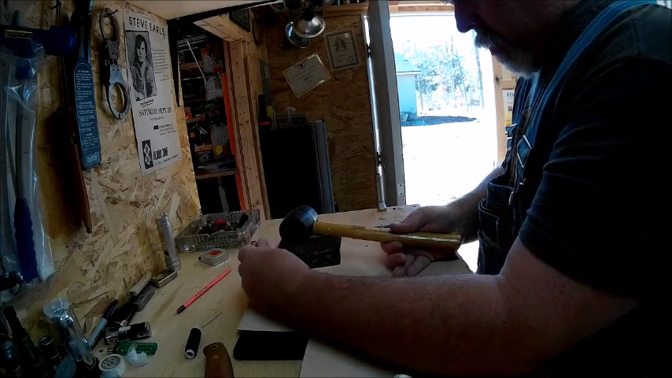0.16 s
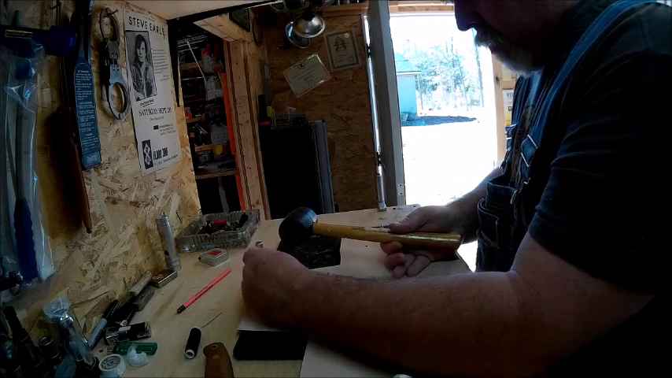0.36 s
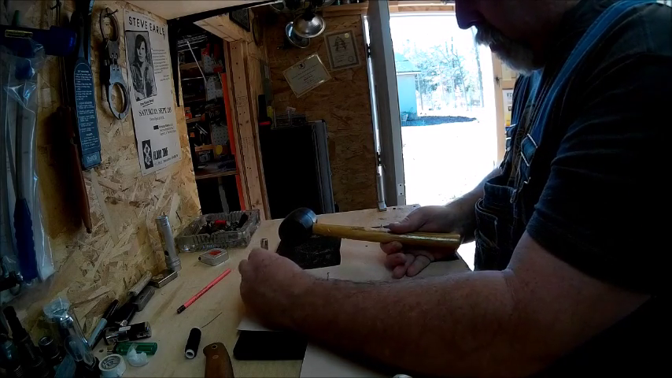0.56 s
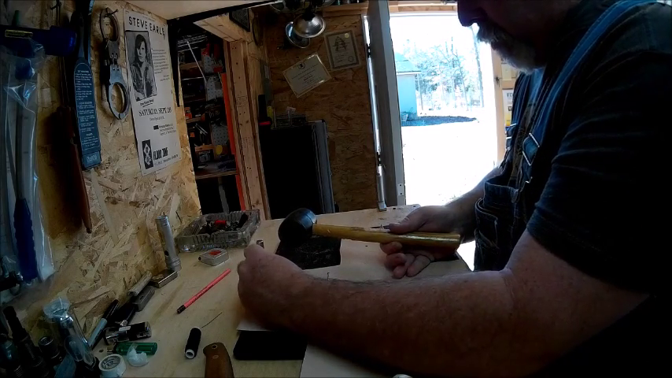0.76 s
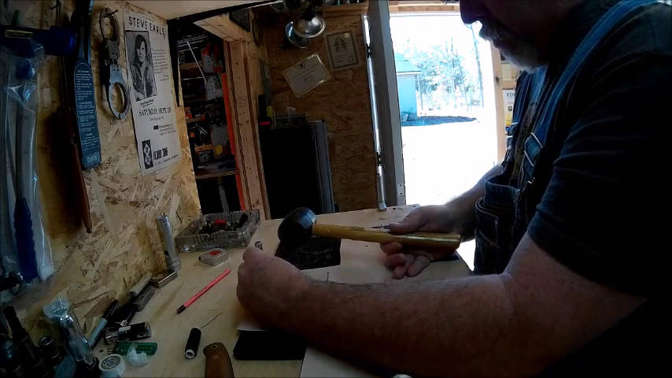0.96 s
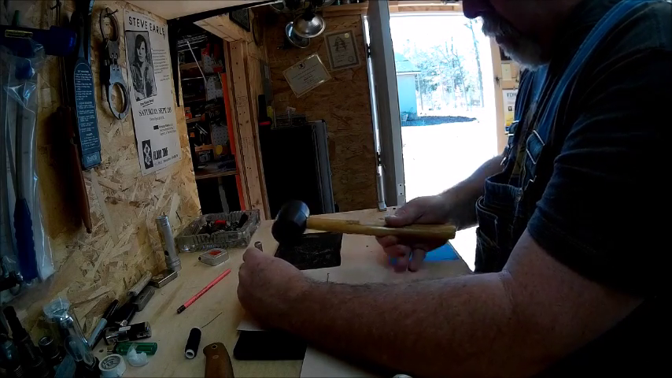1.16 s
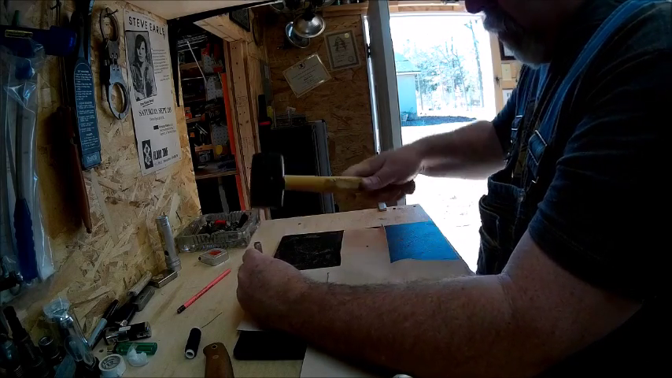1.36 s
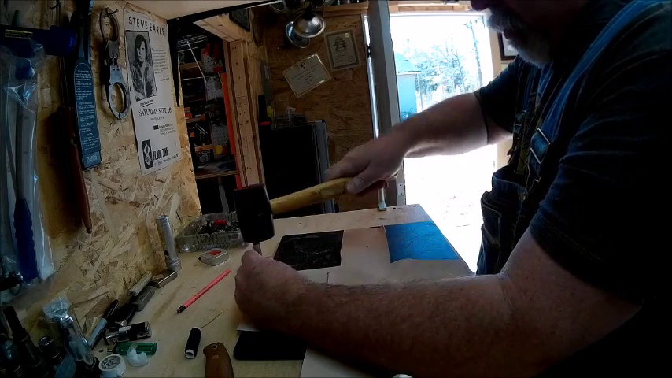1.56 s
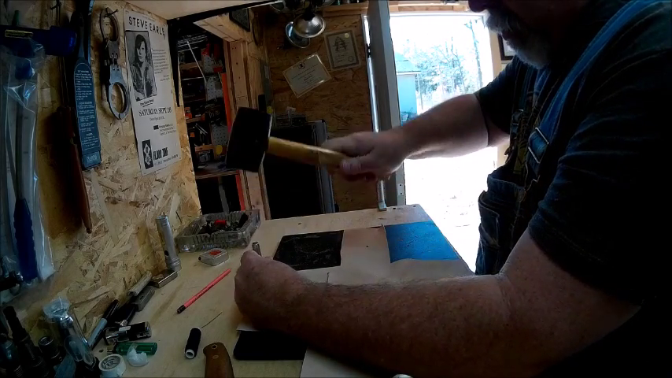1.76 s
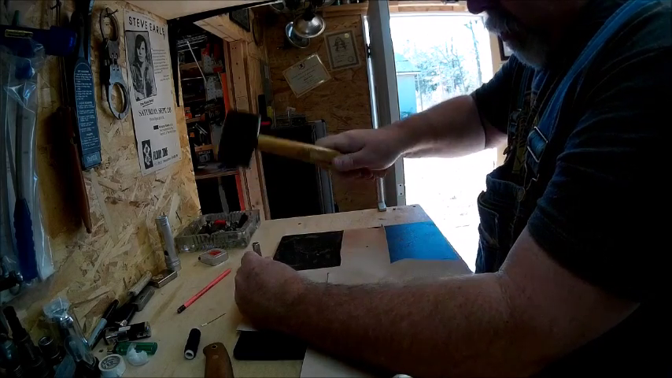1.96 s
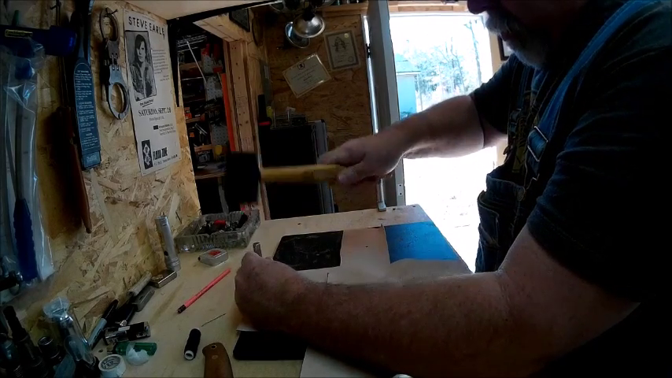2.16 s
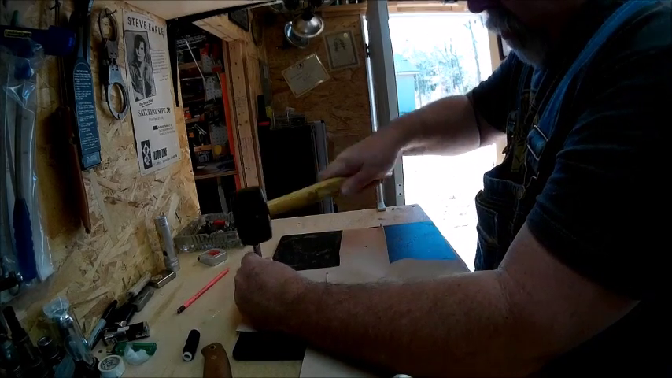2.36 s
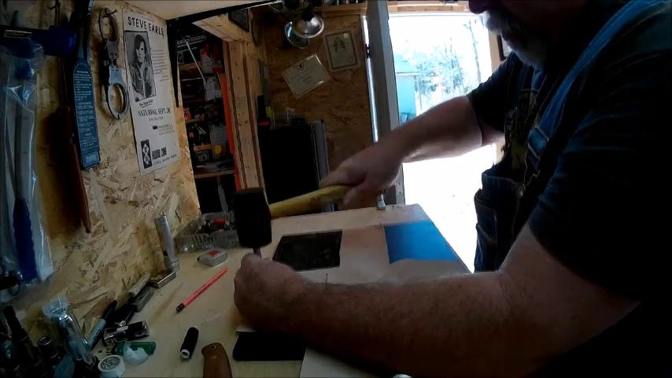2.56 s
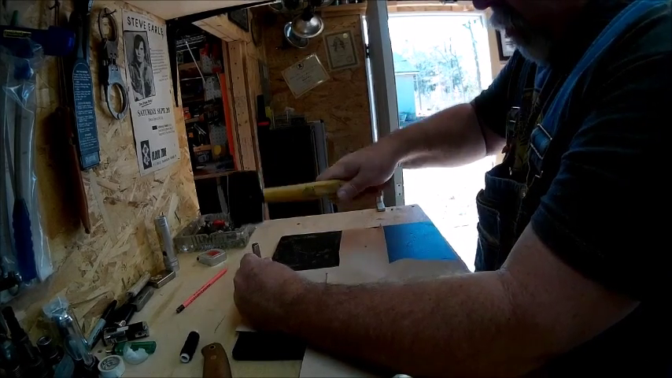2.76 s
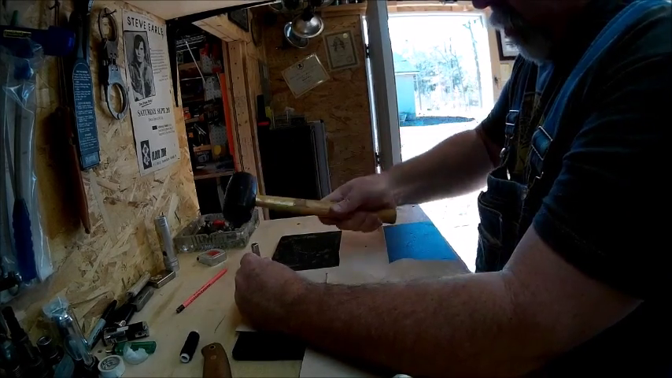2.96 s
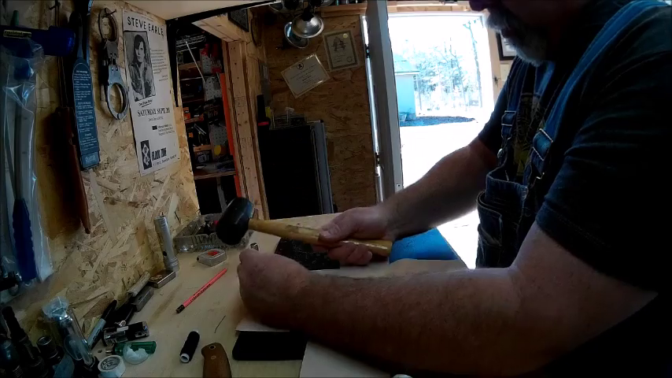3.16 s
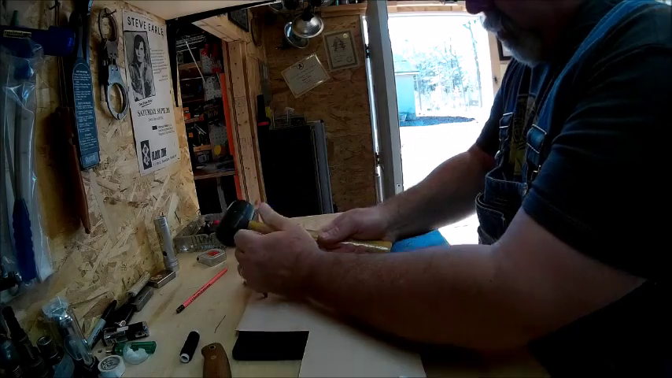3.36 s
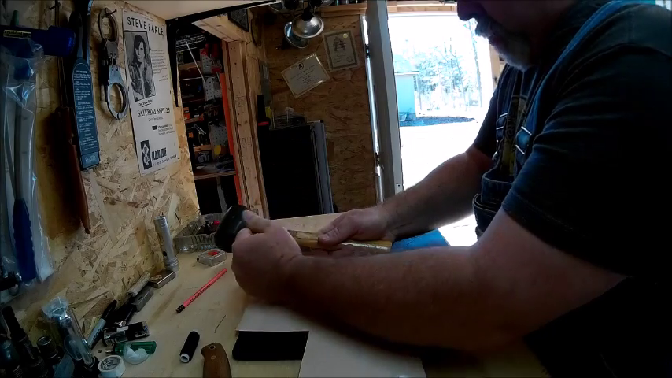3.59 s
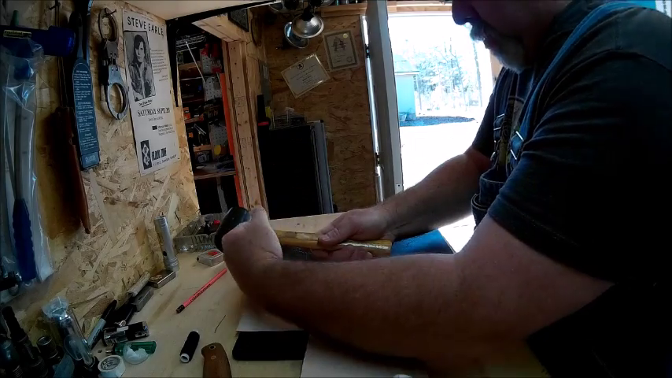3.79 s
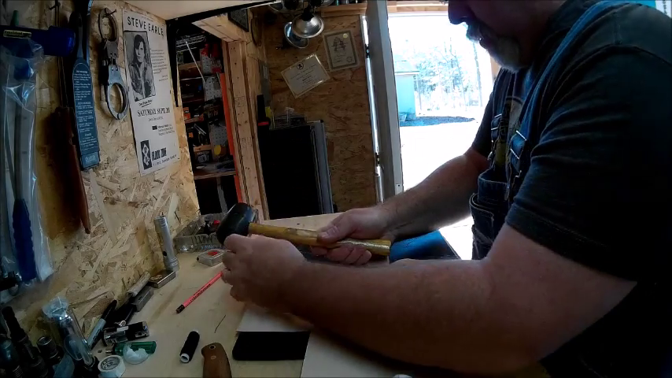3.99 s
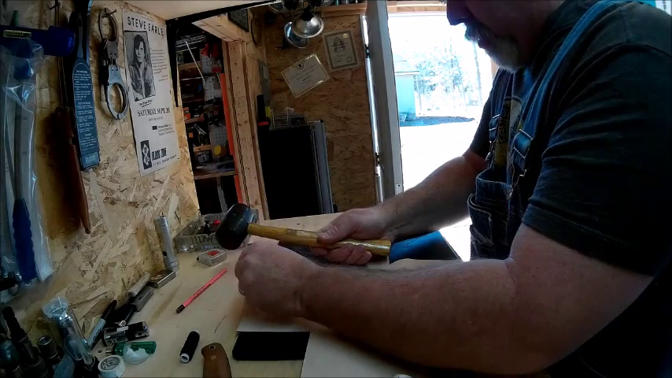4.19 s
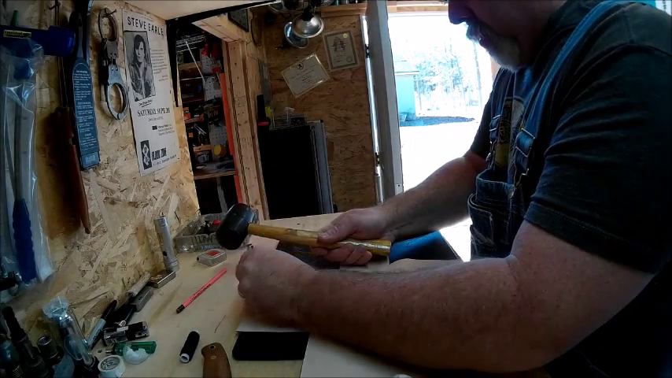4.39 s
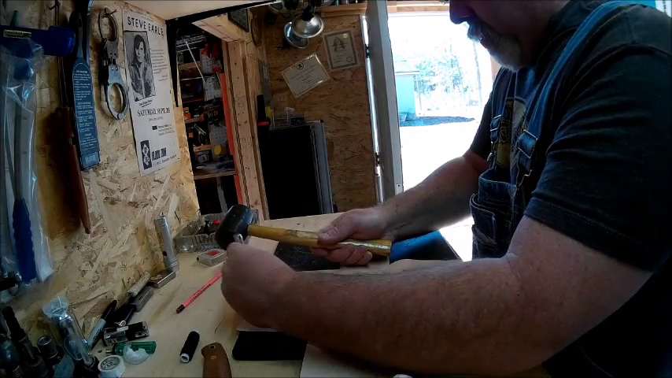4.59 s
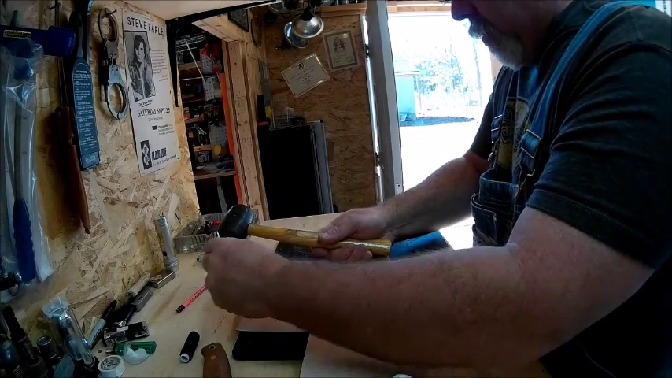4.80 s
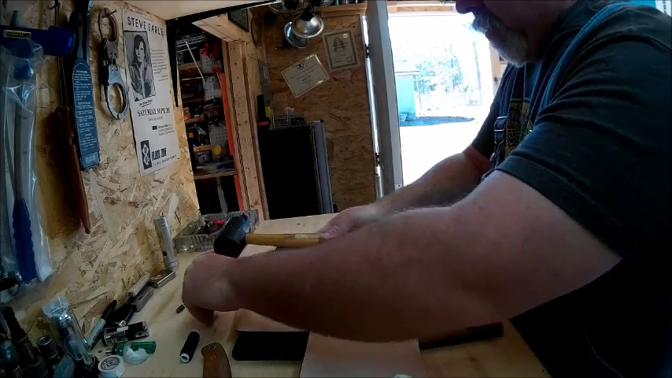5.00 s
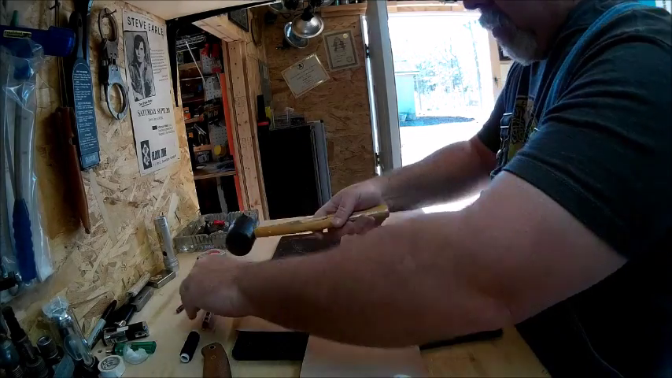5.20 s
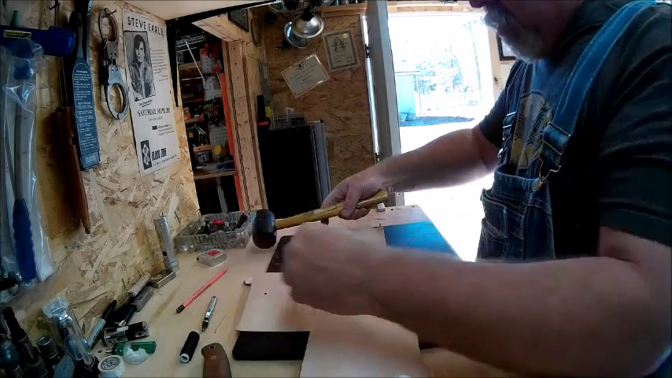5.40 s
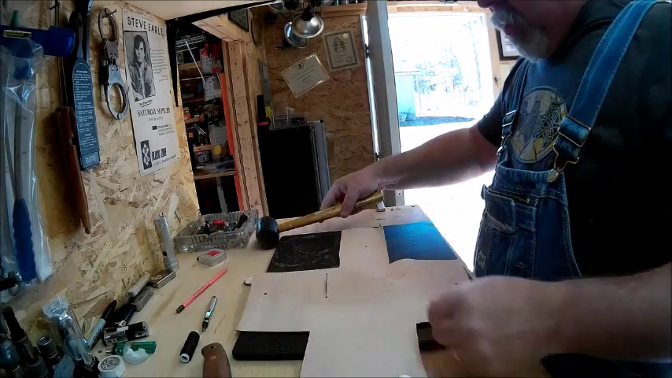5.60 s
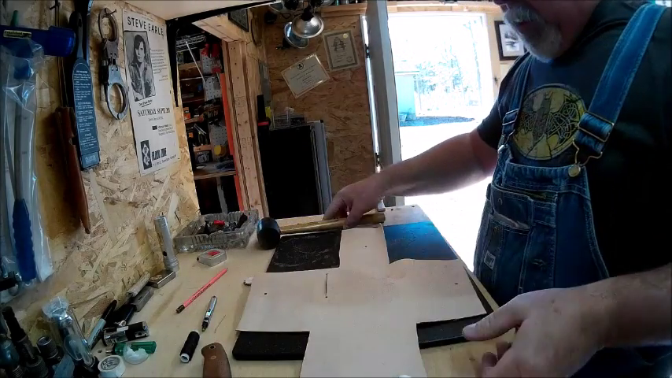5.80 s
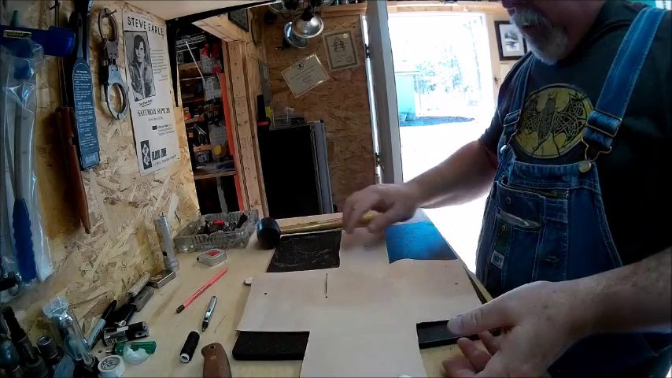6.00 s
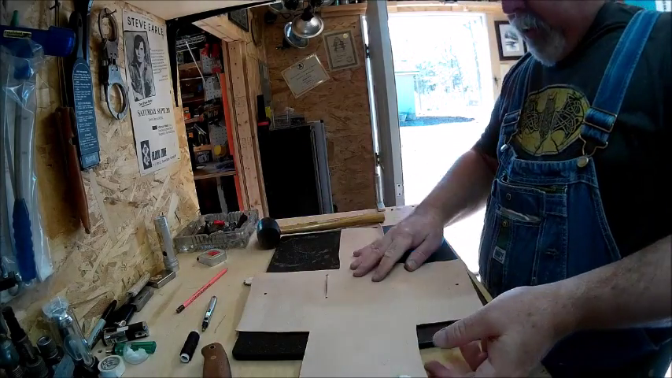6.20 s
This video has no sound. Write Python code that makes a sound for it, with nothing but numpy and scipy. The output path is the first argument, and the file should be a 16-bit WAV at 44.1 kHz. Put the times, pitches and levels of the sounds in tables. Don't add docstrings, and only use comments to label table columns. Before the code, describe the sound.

Close to a wooden bench in a small workshop, a mallet touches a steel punch lightly, then strikes four quick, even blows through leather, the last two hardest. Each is a clipped thud and crack, with loose tools hopping and rattling after. Small snaps and faint bumps follow, then the punch clacks down, the mallet lands with duller knocks and a brief drag. Faint outdoor murmur and hiss lie beneath.

```python
import sys
import numpy as np
from scipy import signal
from scipy.fft import rfft, irfft
from scipy.io import wavfile
from scipy.ndimage import uniform_filter1d

SR = 44100
rng = np.random.default_rng(int(sys.argv[2]) if len(sys.argv) > 2 else 0)


def dump_mix(stems):
    frames = np.atleast_2d(stems).T
    limited = np.clip(frames, -1, 1)
    pcm = np.round(limited * 32767).astype(np.int16)
    wavfile.write(sys.argv[1], SR, pcm)


def magnitude_from_level(level_db):
    exponent = np.asarray(level_db, float) / 20
    return 10 ** exponent


N = 275580

# t/s, thud level/dB, clack level/dB, brightness re clack/dB
BLOWS = [
    (1.8483, -1.5, -12, -10),
    (2.0846, -1, -9, -7),
    (2.3213, 1, -7.5, -1),
    (2.5692, 2, -5.5, -8),
]
# t/s, contact time/s, clack level/dB, brightness re clack/dB, clack t60/s
AIM = [
    (1.5113, .0022, -44, -20, .17),
]
# f/Hz, level/dB, t60/s
BENCH_MODES = [(62, -20, .22), (80, -11, .11), (99, -2, .1), (128, -9, .12), (158, 0, .09), (165, 9, .03),
               (246, -29, .5), (255, -14, .09), (338, -23, .35), (362, -6, .14), (455, -12, .08),
               (510, -20, .16), (575, -13, .11)]
# f/Hz, level/dB
BLOW_COLOUR = [(180, -37.5), (300, -13), (437, -4.5), (577, -6.5), (814, -5), (1020, -4), (1670, -5),
               (1820, -24.5), (2480, -20.5), (3440, -27), (4620, -27), (10600, -38.5), (15000, -49.5)]
# f/Hz, level/dB
TOOL_COLOUR = [(240, -39.5), (400, -2), (842, -2), (1150, -2.5), (1440, 4), (1960, -6), (2570, -14),
               (3360, -22.5), (4590, -18), (7840, -37), (14000, -48)]


def read(points, hz):
    f, value = np.transpose(points)
    return np.interp(np.log(hz + 1), np.log(f + 1), value)


def add(mix, s, sound):
    part = mix[round(s * SR):][:len(sound)]
    part += sound[:len(part)]


def peaked(x, db):
    power = uniform_filter1d(x ** 2, size=200)
    return magnitude_from_level(db) * x / np.sqrt(power.max())


def thud(modes, weights_db, contact_s, rise_s):
    t = np.arange(SR // 2) / SR
    hz, mode_db, t60 = np.transpose(modes)[:, :, None]
    decay = magnitude_from_level(mode_db + weights_db - 60 * t / t60)
    ring = -(decay * np.cos(2 * np.pi * hz * t)).sum(0)
    push = np.sin(np.pi * np.arange(0, 1, 1 / (contact_s * SR)))
    return signal.fftconvolve(ring * (1 - np.exp(-t / rise_s)), push / push.sum())


def soft_thud(db, pitch_hz, focus_db=5):
    # f/Hz, level/dB, t60/s
    far_end = [(71.4, -26, 0.12), (102.2, -2.5, 0.16), (127.8, 2.5, 0.2), (182.3, -2.5, 0.21),
               (243, 4, 0.031), (354.7, -9.5, 0.24), (382.3, 1.5, 0.081), (509, -2.5, 0.079),
               (575, -8, 0.047)]
    off_pitch_octaves = np.log2(np.transpose(far_end)[0][:, None] / pitch_hz)
    weights_db = -focus_db * off_pitch_octaves ** 2
    return peaked(thud(far_end, weights_db, contact_s=0.00079, rise_s=0.0036), db)


def clack(db, colour, bright_db, t60, noise, rise_s=.0004, high_damping=0.28):
    t, hz = np.arange(len(noise)) / SR, np.fft.rfftfreq(len(noise), 1 / SR)
    above_knee = np.clip(np.log2((hz + 1) / 1700) / .6, 0, 1)
    softness_db = (bright_db + 16.0) * above_knee
    centres = 250 * 2 ** (np.arange(13)[:, None] / 2)
    shares = np.clip(1 - abs(2 * np.log2((hz + 1) / centres)), 0, 1)
    coloured = rfft(noise) * magnitude_from_level(read(colour, hz) + softness_db)
    bands = irfft(coloured * shares, len(noise))
    fall_db_per_s = 60 / np.clip(t60, .008, .6) * (centres / 1300) ** high_damping
    decaying = (bands * magnitude_from_level(-fall_db_per_s * t)).sum(0)
    return peaked(decaying * (1 - np.exp(-t / rise_s)), db)


def hush(patchy_db=1.):
    # f/Hz, level/dB
    hush_colour = [(12, -40.5), (20, 8), (91, -2), (150, -1.5), (193, -7), (241, -5), (780, -15.5),
                   (873, -16.5), (1290, -17), (2140, -21.5), (13900, -24.5), (16000, -33.5)]
    level_db = -63
    frame_count, hz = N // 256 + 5, np.fft.rfftfreq(1024, 1 / SR)
    real, imag, patches = rng.standard_normal((frame_count, 513, 3)).T
    patches = uniform_filter1d(uniform_filter1d(patches, 8, 0), 16, 1)
    drift_db = patchy_db * patches / patches.std() * (hz < 2000)[:, None]
    spectra = (real + 1j * imag) * magnitude_from_level(read(hush_colour, hz)[:, None] + drift_db)
    noise = signal.istft(spectra, nperseg=1024, noverlap=768)[1][:N]
    return magnitude_from_level(level_db) * noise / noise.std()


def shed(x):
    # f/Hz, t60/s
    room_decay = [(60, 0.43), (250, 0.29), (1000, 0.25), (3000, 0.14), (8000, 0.17), (15000, 0.15)]
    reflections = np.zeros(SR)
    at = np.arange(150, SR - 20, 20)
    reflections[at + rng.integers(0, 20, len(at))] = rng.choice([-1., 1.], len(at))
    hz, t, z = signal.stft(reflections, SR, nperseg=256)
    thin_walls = (hz ** 2 / (hz ** 2 + 500 ** 2))[:, None]
    decay = magnitude_from_level(-60 * t / read(room_decay, hz)[:, None])
    tail = signal.istft(z * decay * thin_walls, SR, nperseg=256)[1]
    return signal.fftconvolve(x, tail / np.linalg.norm(tail))[:N]


def rumble(db=-30, t60=0.55, top_hz=170):
    out, t = np.zeros(N), np.arange(24000) / SR
    low = signal.butter(N=2, Wn=[58, top_hz], btype="band", fs=SR, output="sos")
    strikes = BLOWS + [(AIM[0][0], -18)]
    envelope = magnitude_from_level(-60 * t / t60) * (1 - np.exp(-t / .01))
    for row, noise in zip(strikes, rng.standard_normal((len(strikes), len(t)))):
        add(out, row[0], peaked(signal.sosfilt(low, noise) * envelope, db + row[1]))
    return out


def drag(slips_per_s=2500, spread_db=2):
    # f/Hz, width/Hz, level/dB
    drag_body = [(2130, 85, 7), (1500, 950, 3), (4330, 820, -12), (9000, 2100, -19)]
    start_s, length_s, level_db, sag_db = 5.685, 0.113, -56.5, -6
    t = np.arange(0, length_s, 1 / SR)
    chance, size, side = rng.random((8192, 3))[:len(t)].T
    sizes = magnitude_from_level(-spread_db * np.log(size + 1e-9))
    slips = sizes * (chance < slips_per_s / SR) * np.sign(side - .5)
    body = sum(magnitude_from_level(g) * signal.lfilter(*signal.iirpeak(f, f / w, SR), slips) for f, w, g in drag_body)
    out = np.zeros(N)
    stroke = magnitude_from_level(level_db + sag_db * t / length_s) * signal.windows.tukey(len(t), .25)
    add(out, start_s, body / body.std() * stroke)
    return out


def steel():
    # t/s, f/Hz, level/dB, t60/s
    steel_lines = [
        (5.21, 6040, -49, .22),
        (2.69, 11230, -68, .35),
        (2.75, 11230, -68, .35),
        (6.228, 1185, -57, .06),
        (3.539, 1150, -50, .035),
    ]
    out, t = np.zeros(N), np.arange(SR // 3) / SR
    for s, hz, db, t60 in steel_lines:
        add(out, s, magnitude_from_level(db - 60 * t / t60) * np.sin(2 * np.pi * hz * t))
    return out


def snaps():
    # t/s, level/dB, t60/s
    releases = [
        (3.5354, -46, 0.025),
        (3.5405, -55.5, 0.04),
        (4.3914, -60.5, 0.028),
        (5.497, -58, 0.0076),
    ]
    # f/Hz, level/dB
    snap_colour = [(530, -37), (900, -7), (1850, -1), (3430, -11), (4800, -3), (5680, -13), (6560, -4),
                   (16000, -23)]
    out = np.zeros(N)
    for (s, db, t60), noise in zip(releases, rng.standard_normal((len(releases), 2048))):
        add(out, s, clack(db, snap_colour, -12.5, t60, noise))
    return out


def taps(crack_db=1, note_db=9):
    # t/s, clack level/dB, thud re clack/dB, thud f/Hz, note f/Hz
    handle_taps = [
        (3.963, -35.5, -5, 220, 622),
        (5.072, -35.5, -12, 402, 1353),
        (5.83, -32.5, -16, 366.5, 1140),
    ]
    # f/Hz, level/dB
    handle_colour = [(150, -10), (250, -5), (383, 3.5), (715, 0.5), (1050, 1.5), (1340, 3.5), (1770, -4.5),
                     (2330, -30.5), (6000, -40.5), (7800, -76.5), (13200, -120)]
    out, t = np.zeros(N), np.arange(4096) / SR
    for row, noise in zip(handle_taps, rng.standard_normal((len(handle_taps), 8192))):
        s, db, thud_db, thud_hz, note_hz = row
        add(out, s, clack(db + crack_db, handle_colour, -11, 0.0062, noise[-1024:], rise_s=0.0018))
        add(out, s, clack(db, handle_colour, -10.5, 0.15, noise))
        envelope = magnitude_from_level(db + note_db - 60 * t / .04) * (1 - np.exp(-t / .0005))
        add(out, s, envelope * np.sin(2 * np.pi * note_hz * t))
        add(out, s, soft_thud(db + thud_db + 5, thud_hz, focus_db=1.5))
    return out


def knocks():
    # t/s, clack level/dB, thud re clack/dB, thud f/Hz
    landings = [(3.179, -72, 14, 78), (3.628, -76.5, 21, 96.3), (3.769, -72, 22.5, 94.2),
                (5.2092, -20, -5.5, 423), (5.2419, -28.5, -3.5, 435), (5.263, -36.5, -0.5, 388),
                (5.498, -49, 20, 197), (5.508, -52.5, 26, 154), (5.548, -34, 17.5, 390),
                (5.565, -31, 7.5, 378), (5.596, -47, 13, 150), (5.618, -57.5, 30, 130),
                (5.644, -54, 22.5, 395), (5.685, -59.5, 21.5, 257), (5.735, -58, 17, 110),
                (5.778, -60.5, 26.5, 109), (6.232, -63.5, -4, 148)]
    # f/Hz, level/dB
    knock_colour = [(150, -21), (250, -15), (369, -1), (606, -5), (921, 3), (1150, -0.5), (1530, 5),
                    (2710, -6.5), (4790, -11.5), (5650, -23.5), (9000, -45), (11700, -78), (19800, -120)]
    # brightness re clack/dB, crack re clack/dB, clack t60/s, t60 left by the holding hand/s
    punch_down = (-12, 6, 0.19, 0.5)
    mallet_down = (-21, -3, .075, .11)
    mallet_down_s, bounce_gap_s, bounce_db = 5.4, .037, -7
    out, before = np.zeros(N), 0
    for row, noise in zip(landings, rng.standard_normal((len(landings), 8192))):
        s, db, thud_db, pitch_hz = row
        bright_db, crack_db, t60, held_t60 = punch_down if s < mallet_down_s else mallet_down
        if 0 < s - before < bounce_gap_s:
            bright_db += bounce_db
            crack_db += bounce_db / 2
        before = s
        add(out, s, clack(db + crack_db, knock_colour, bright_db + 3, 0.012, noise[-2048:], rise_s=0.0006))
        add(out, s, clack(db, knock_colour, bright_db, t60, noise))
        push = soft_thud(db + thud_db, pitch_hz)
        add(out, s, push * magnitude_from_level(-60 * np.arange(len(push)) / SR / held_t60))
    return out


def tools():
    # t/s, clack level/dB, brightness re clack/dB
    rattles = [(1.517, -39, -12), (1.924, -31.5, -8), (1.971, -37, -3.5), (2, -39.5, -12.5),
               (2.23, -36, -3), (2.269, -39, -18), (2.295, -43, -28.5), (2.424, -31.5, -6),
               (2.475, -34.5, -7), (2.503, -44, -8), (2.524, -42, -18), (2.691, -30.5, -8.5),
               (2.734, -37.5, -5.5), (2.749, -29, -4.5), (2.788, -33.5, -10.5), (2.815, -44.5, -18.5),
               (2.863, -49.5, -46), (2.896, -56, -25)]
    out = np.zeros(N)
    for (s, db, bright_db), noise in zip(rattles, rng.standard_normal((len(rattles), 4096))):
        add(out, s, clack(db, TOOL_COLOUR, bright_db, 0.081, noise, rise_s=0.0011))
    return out


def aim():
    # f/Hz, level/dB
    light_touch = [(60, -22), (95, -16), (160, -24), (250, -20.5), (360, -17), (575, -14)]
    out, (s, contact_s, db, bright_db, t60) = np.zeros(N), AIM[0]
    weights_db = read(light_touch, np.transpose(BENCH_MODES)[0][:, None])
    add(out, s, thud(BENCH_MODES, weights_db, contact_s, rise_s=.0005))
    add(out, s, clack(db, BLOW_COLOUR, bright_db, t60, rng.standard_normal(8192)))
    return out


def mallet(crack_db=6, chatter_db=-20, change=0.91):
    # f/Hz, level/dB, t60/s
    head_modes = [(690.7, -18.5, .1), (864, -19.5, 0.1), (1108, -19.5, 0.077), (1229.5, -14, 0.074),
                  (1359, -12, 0.078), (1532, -17, 0.087), (1628, -10, .08), (2870, -13.5, 0.048),
                  (5080, -20.5, 0.043)]
    out, spot = np.zeros(N), rng.standard_normal(16384)
    noises = rng.standard_normal((len(BLOWS), 2, 16384))
    for (s, strength_db, db, bright_db), (variation, chatter) in zip(BLOWS, noises):
        add(out, s, thud(BENCH_MODES, strength_db, contact_s=.0005, rise_s=.0002))
        add(out, s, thud(head_modes, db + 10.5, contact_s=.0001, rise_s=.0003))
        first_contact = thud(head_modes, db + 17, contact_s=.0001, rise_s=.0001)[:176]
        add(out, s, first_contact * np.hanning(352)[176:])
        struck = spot + change * variation
        add(out, s, clack(db + crack_db, BLOW_COLOUR, bright_db, 0.015, struck[-2048:], rise_s=0.000067))
        add(out, s, clack(db, BLOW_COLOUR, bright_db, 0.052, struck, high_damping=0.29))
        add(out, s, clack(db + chatter_db, TOOL_COLOUR, bright_db, 0.48, chatter,
                          rise_s=0.0025, high_damping=.25))
    return out


def scene():
    bench = mallet() + aim() + tools() + knocks() + taps() + snaps() + steel() + drag()
    bench = signal.sosfilt(signal.butter(N=3, Wn=62, btype="high", fs=SR, output="sos"), bench)
    return (bench + rumble() + magnitude_from_level(-14) * shed(bench) + hush())[None]


def low_pass(x):
    return signal.sosfilt(signal.butter(12, 16550, fs=SR, output="sos"), x)


def record(dry):
    capsule = signal.lfilter(*signal.butter(N=1, Wn=25, btype="high", fs=SR), dry)
    clipped = np.clip(capsule, -.975, .975)
    coupled = signal.lfilter(*signal.butter(1, 4, "high", fs=SR), clipped)
    band_limited = signal.oaconvolve(coupled, signal.firwin(255, 16450, fs=SR)[None], "same")
    return low_pass(band_limited)


dry = scene()
out = record(dry)
dump_mix(out)
```